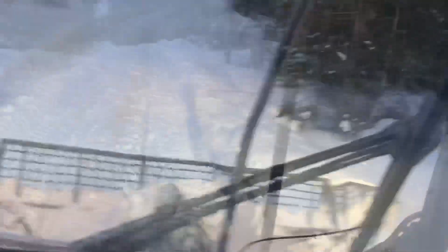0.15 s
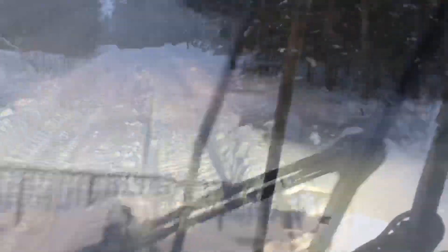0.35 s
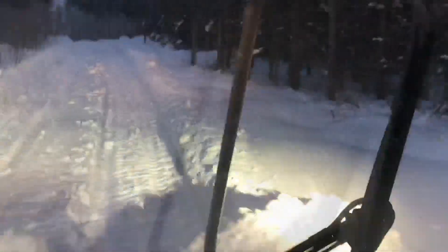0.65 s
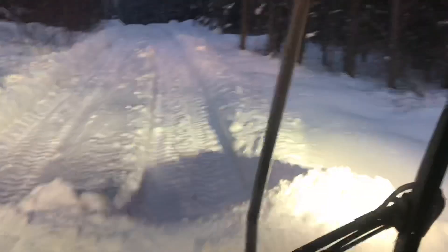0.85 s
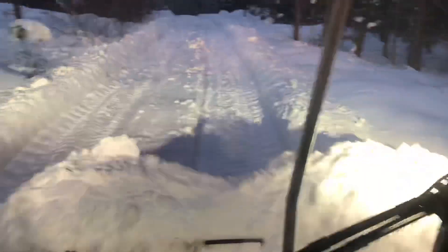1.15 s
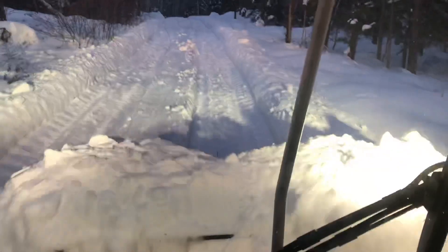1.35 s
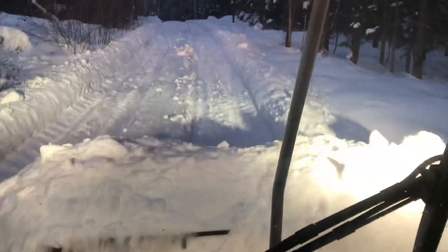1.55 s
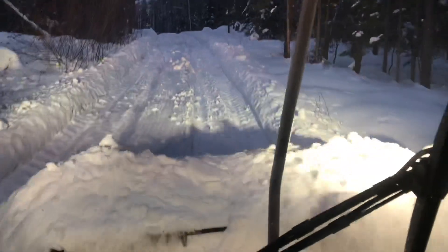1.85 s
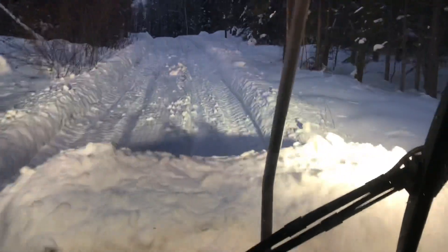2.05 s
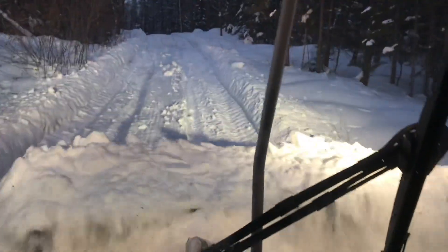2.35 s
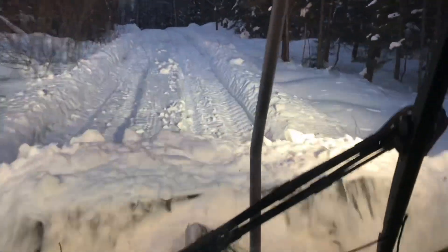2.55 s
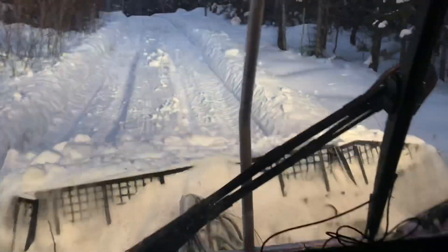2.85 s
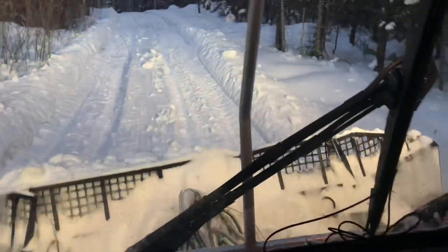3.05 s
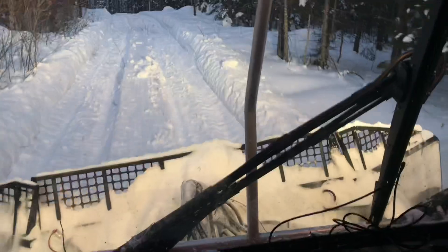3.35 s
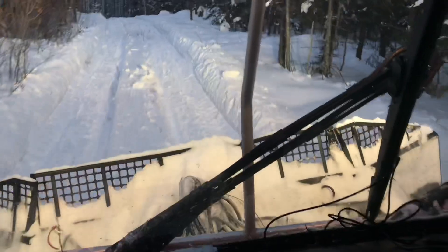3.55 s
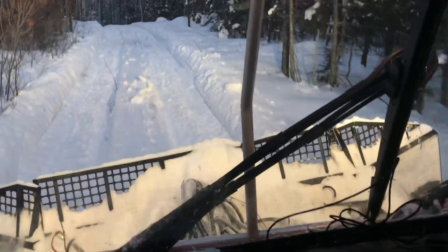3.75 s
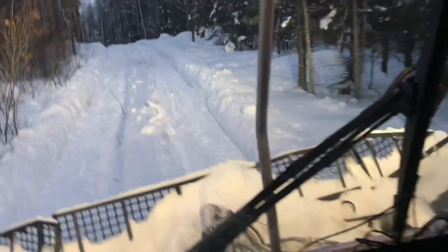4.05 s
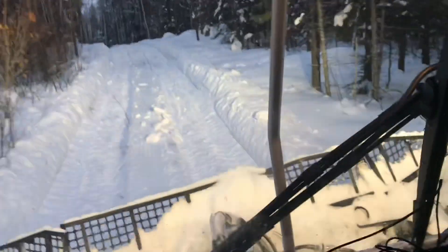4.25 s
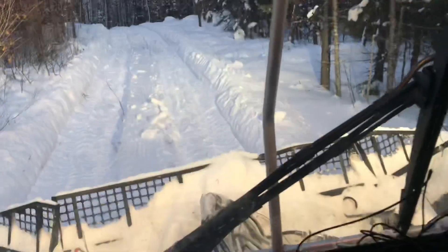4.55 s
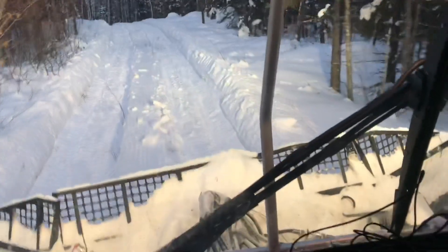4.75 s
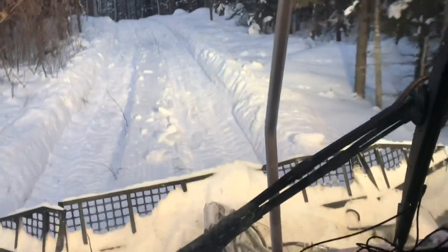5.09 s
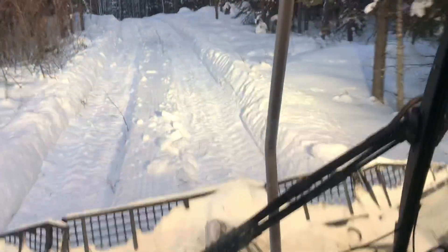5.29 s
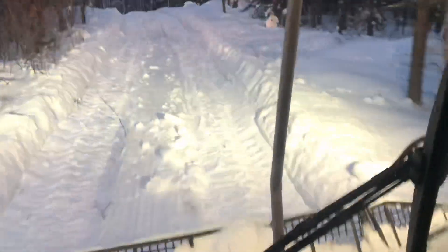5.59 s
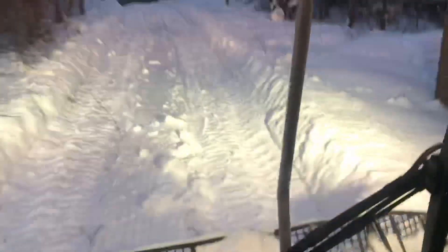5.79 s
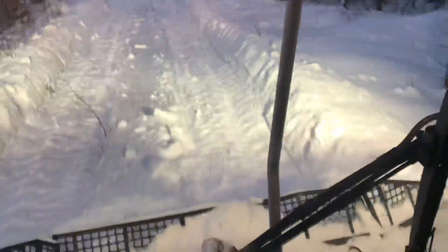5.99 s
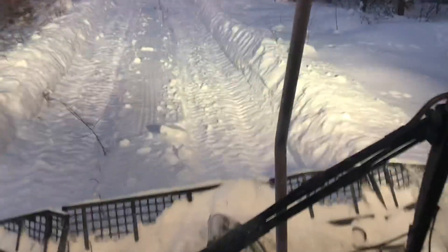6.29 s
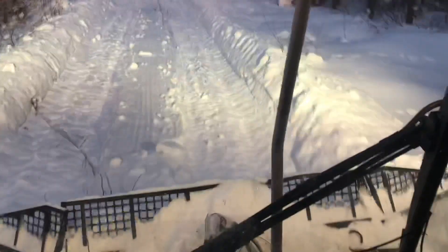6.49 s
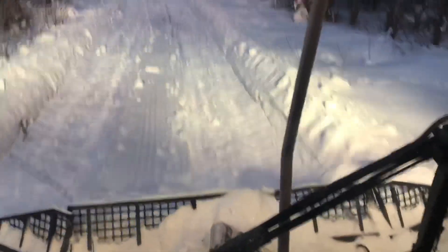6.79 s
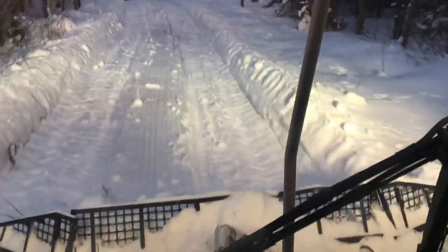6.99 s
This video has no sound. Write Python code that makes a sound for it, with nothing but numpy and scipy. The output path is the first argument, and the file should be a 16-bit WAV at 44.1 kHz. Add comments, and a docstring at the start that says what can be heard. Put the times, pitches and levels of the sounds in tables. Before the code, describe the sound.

A heavy diesel snow groomer works through deep snow, heard in mono from the driver's seat in a small closed cab. A low, lumpy exhaust drone near 50 hertz runs throughout with deep frame rumble, panel boom, muted clatter, soft hiss and a steady heater-fan hum. A dull bump opens the sound; drive-motor whine climbs over the first second, while pump whine swells until about 2 s. Loose fittings tick around 2.1-2.5 s as the whine rises to a peak near 3.4 s, over slow pulsing track throb. The drone thins around 4 s and the whine sags, with a knock at 4.7 s as power returns. Whine peaks again near 5.6 s. Knocks at 5.7 s lead to a sharp, dense rattle at 6.05-6.1 s while the engine eases. Another knock comes at 6.6 s, and drone and whine build again to the end at 7.1 s. A faint, breathy turbo whistle glides very high above.

```python
"""Cab of a snow groomer pushing deep snow. Diesel drone is a sum of engine orders; a geared shaft, whining
hydraulic pumps and a very high turbo whistle are partly smeared tones. Motor whine and cleat throb follow
one track speed. Filtered noise makes frame rumble, panel boom, clatter and hiss, with a buzz of engine orders.
Loose fittings tick and knock as decaying noise bursts, panels swell on single notes, a heater fan hums."""
import sys
import numpy as np
from scipy import signal
from scipy.fft import rfft, irfft, next_fast_len
from scipy.io import wavfile
from scipy.ndimage import uniform_filter1d

SR = 44100
rng = np.random.default_rng(int(sys.argv[2]) if len(sys.argv) > 2 else 0)


def store_pcm(level_fs):
    """Save levels as 16-bit WAV."""
    pcm = np.round(np.clip(level_fs, -1, 1) * 32767).astype(np.int16)
    wavfile.write(sys.argv[1], SR, np.atleast_2d(pcm).T)


N = 314425
TIME_S = np.arange(N) / SR

# engine speed: t/s, exhaust beat f/Hz
ENGINE_BEAT = [(0.0, 51.58), (0.32, 50.6), (0.8, 53.48), (1.12, 52.4), (1.92, 53.04), (2.4, 55.15),
               (2.56, 55.14), (2.72, 54.42), (2.88, 54.33), (3.2, 55.59), (3.84, 56.26), (4.48, 53.74),
               (4.96, 53.42), (5.6, 55.38), (6.08, 54.4), (6.24, 53.11), (6.4, 52.46), (7.13, 54.42)]
# engine load, easing briefly near 4 s and 6 s: t/s, level/dB re full load
ENGINE_LOAD = [(0.0, -2.5), (0.16, -11), (0.48, -9), (1.12, -5.5), (2.08, -1), (2.56, 4), (2.72, -3),
               (3.52, -3), (4.16, -14), (4.32, -15), (5.12, 2), (5.92, -8), (6.24, -11), (6.88, -1),
               (7.13, -5)]
# track speed: t/s, drive motor whine f/Hz
MOTOR_PITCH = [(0.0, 222.0), (0.56, 255.0), (1.28, 268.15), (1.6, 263.17), (1.76, 252.75), (2.08, 263.07),
               (2.88, 319.74), (3.36, 338.98), (3.68, 334.75), (4.16, 281.29), (4.32, 270.98),
               (4.64, 277.51), (5.28, 329.26), (5.76, 331.89), (6.24, 306.74), (6.4, 289.23),
               (7.13, 323.42)]
CRUISE_BEAT_HZ, CRUISE_MOTOR_HZ = 54, 300

# exhaust beat, its second and its fourth order: t/s, level/dB
EXHAUST_LEVEL = [(0, -30), (.3, -31), (.62, -23.5), (.85, -28.5), (1.1, -23), (1.35, -23.5), (1.6, -25),
                 (2.15, -23), (2.5, -33.5), (3.1, -22.5), (3.4, -36), (4, -47), (4.55, -36), (4.82, -24.5),
                 (5.25, -25.5), (5.65, -34), (6, -50), (6.25, -34), (6.6, -27.5), (7.13, -24.5)]
SECOND_LEVEL = [(0, -37), (.6, -30.5), (.85, -34), (1.08, -27.5), (1.55, -29.5), (1.92, -38), (2.25, -31),
                (2.55, -34), (2.83, -28), (3.1, -33), (3.4, -35), (3.7, -39), (4.25, -40), (4.65, -35),
                (5.1, -27.5), (5.8, -45), (6.55, -37.5), (6.85, -27), (7.13, -30)]
FOURTH_LEVEL = [(0, -39.5), (.4, -47), (.85, -34.5), (1.5, -31.5), (2.25, -30), (2.8, -31.5), (3.55, -28),
                (3.9, -35.5), (4.15, -55), (4.3, -33), (4.5, -30), (4.8, -32.5), (5.3, -32), (5.7, -37),
                (6.03, -46), (6.3, -32.5), (6.6, -32.5), (7.13, -29.5)]
# quarter orders from unequal cylinders, repeating once per engine cycle: multiple of beat, level/dB
CYLINDER_ORDERS = [(.5, -47), (1.25, -45), (1.75, -43.5), (2.5, -44), (3.25, -44.5), (4.5, -50), (5.5, -51),
                   (6, -53.5), (6.25, -51.5), (7, -57.5), (8, -53), (8.25, -57), (9.5, -54.5), (14, -67),
                   (14.5, -60), (18.25, -57), (20, -81)]

# low hum of a geared shaft: t/s, level/dB
SHAFT_LEVEL = [(0, -53), (1.9, -46), (2.3, -34.5), (2.8, -31), (3.4, -29.5), (4.1, -29.5), (4.35, -36),
               (4.9, -40), (5.05, -35), (5.9, -30), (6.1, -40), (7.13, -32)]
# gear and auxiliary tones: level/dB at full load and cruise, slope/(dB per dB load), slope/(dB per Hz beat)
GEAR_SLOPES = (-64.5, -0.7, .5)
AUXILIARY_SLOPES = (-47, 0, 0.91)
SHAFT_ORDER, GEAR_ORDER = 2.76, 15  # multiples of the beat

# pump piston tone, swelling with oil pressure: t/s, level/dB
PISTON_LEVEL = [(0, -54), (.5, -42), (.8, -37.5), (1.1, -33.5), (1.4, -33), (1.9, -30.5), (2.4, -40),
                (2.9, -38), (3.5, -42), (4.15, -55), (4.45, -40.5), (5.15, -36.5), (5.5, -39.5), (5.8, -51),
                (6.08, -45), (6.35, -38), (6.7, -35), (7.13, -40.5)]
# its octave: t/s, level/dB
OCTAVE_LEVEL = [(0, -51.5), (.45, -40.5), (.83, -53.5), (.99, -39.5), (1.5, -46.5), (1.95, -50),
                (2.45, -45), (2.9, -48.5), (3.8, -46.5), (4.3, -56), (5.2, -53), (5.6, -47.5), (5.95, -56),
                (6.4, -47), (7.13, -56)]
PISTON_ORDER, AUXILIARY_ORDER = 6.39, 9.74  # multiples of the beat

# drive motor whine before the cab resonance lifts it: t/s, level/dB
WHINE_LEVEL = [(0, -48), (.6, -47), (1, -44.5), (1.3, -46.5), (1.7, -44), (2.1, -45), (2.6, -39.5),
               (3.2, -46), (4, -50.5), (4.3, -47), (4.8, -43.5), (5.4, -46), (6, -57), (7.13, -55)]
# cleats on snow: t/s, level/dB
THROB_LEVEL = [(0, -55), (.8, -27.5), (1.1, -35), (1.35, -25), (1.6, -30), (1.75, -54), (2.05, -32),
               (2.55, -22.5), (2.95, -33), (3.15, -50), (3.55, -24), (3.85, -37), (4.25, -36), (4.6, -25.5),
               (5.2, -33), (5.4, -24), (5.7, -39), (6.0, -29.5), (6.25, -23), (6.45, -30), (6.72, -28),
               (7.13, -29)]
WHINE_PER_CLEAT = 7.45  # frequency ratio
SLIP_RMS_HZ = 1.553
CAB_RESONANCE_HZ, CAB_RESONANCE_WIDTH_HZ, CAB_RESONANCE_DB = 259.3, 30.4, 17

# turbo before rotor inertia smooths its pitch: t/s, blade tone f/Hz, reference level/dB
TURBO_BLADES = [(0, 13750, -63), (.18, 13400, -73), (.45, 11520, -79), (.7, 12020, -68.5),
                (1.55, 13650, -66.5), (2.6, 14650, -66), (3.8, 14950, -65), (4.27, 13100, -70),
                (4.7, 13280, -71), (5.55, 14180, -64), (6, 12550, -71), (6.35, 12130, -69),
                (7.13, 13400, -67)]
TURBO_INERTIA_S = .22

# knocks and ticks: t/s, ring level/dB, centre f/Hz, spread/octaves, t60/s, snap level/dB
FITTING_HITS = [(.069, -39.5, 1100, 1.1, 0.065, -60), (.224, -55, 10900, .27, .045, -58),
                (.334, -52, 5850, .18, .08, -62), (2.138, -38.5, 1200, .8, .09, -41),
                (2.167, -50, 6000, .3, .04, -54), (2.29, -40, 900, .8, 0.065, -39),
                (2.292, -44, 7000, 1.6, 0.11, -48), (2.542, -45, 2850, .13, .13, -48),
                (3.94, -40.5, 3180, 0.7, 0.076, -56), (4.245, -44.5, 5960, .1, .065, -44),
                (4.662, -31.5, 1150, 0.66, 0.086, -52), (5.111, -54, 12300, .2, .05, -57),
                (5.643, -38, 2000, 1.4, .08, -46), (5.646, -50, 8300, .15, .06, -56.5),
                (5.721, -26.5, 1100, .45, .07, -39.5), (5.722, -39, 4600, .35, .08, -46),
                (5.751, -42, 3500, 0.54, .06, -46), (5.775, -42.5, 3600, 0.71, .07, -42),
                (5.794, -43, 2200, .8, .09, -55), (5.884, -51, 10500, .4, .035, -50),
                (5.902, -55, 9000, .6, .04, -52), (5.921, -55, 10000, .4, .04, -53),
                (5.977, -52, 6500, .5, .04, -56), (6.025, -54, 5500, .5, 0.046, -58),
                (6.054, -43, 3000, 0.65, 0.056, -55), (6.0635, -20, 1300, .5, .04, -41),
                (6.066, -33, 4200, .4, .03, -38), (6.075, -32, 1400, .7, .04, -52),
                (6.082, -34, 2900, 0.43, 0.048, -45), (6.088, -30, 1200, .7, .04, -54),
                (6.099, -32.5, 1200, 0.77, .055, -44), (6.108, -36.5, 1400, 1.04, 0.1, -52),
                (6.138, -55, 7400, .6, .09, -57), (6.153, -53, 7400, .5, .08, -55),
                (6.275, -44, 2500, .5, .06, -62), (6.593, -33.5, 2700, 0.96, 0.087, -44),
                (6.596, -41, 6500, 0.18, 0.055, -50), (6.617, -44, 3400, 0.71, .07, -56),
                (7.087, -54, 9000, .6, .04, -58)]
# resonances of the fittings: f/Hz, width/Hz, gain/dB
FITTING_RESONANCES = [(1115, 160, 15.5), (1470, 250, 1), (2320, 370, 5), (2800, 220, 3.5), (3290, 190, 6),
                      (3970, 380, 6), (5000, 400, 3.5), (5840, 400, 5), (6570, 350, 4), (8300, 500, 4.5),
                      (9400, 360, 4.5), (12400, 700, 3), (14800, 700, 4)]
SNAP_T60_S, SNAP_DULL_HZ, CHATTER_RMS_DB = 0.038, 5000, 1.5

# panel swells over bumps: peak t/s, level/dB, f/Hz, Gaussian half length/s
PANEL_SWELLS = [(0.042, -22.5, 82, 0.035), (0.397, -33.5, 152, 0.11), (1.51, -29.5, 183.7, 0.041),
                (3.4, -22.5, 88, 0.019), (5.846, -30.5, 88.9, 0.23), (5.892, -28.5, 178, 0.064)]

# noise shapes, normalised later: f/Hz, relative density/dB
RUMBLE_SHAPE = [(14, -45), (21, 0), (32, -3.5), (44, 3), (62, -0.5), (85, 1.5), (110, -6), (160, -15.5),
                (400, -87)]
BOOM_SHAPE = [(60, -34), (115, 2.5), (150, -8), (185, 4.5), (205, -3), (250, -6), (320, -8.5), (370, -20.5),
              (450, -37), (620, -27), (1500, -78)]
CLATTER_SHAPE = [(180, 0), (280, 7.5), (400, 12), (440, -1), (520, 7.5), (600, 5), (700, 3), (830, -2),
                 (1030, 4), (1170, 0), (1300, -2.5), (1600, -13), (2200, -21.5), (5000, -43)]
HISS_SHAPE = [(900, -8), (1500, 12.5), (1900, 14), (2350, 10), (2680, 11.5), (3300, 7.5), (4300, 4),
              (5200, -1.5), (6200, -0.5), (7200, -6), (9300, -6.5), (10400, -12.5), (11500, -9),
              (15500, -12)]
# frame rumble, its level changing slowly: t/s, level/dB
RUMBLE_LEVEL = [(0, -38.5), (1.8, -30.5), (2.9, -26.5), (3.7, -27.5), (4.3, -24), (5.6, -26), (6.3, -28.5),
                (7.13, -27)]
# machinery: t/s, clatter level/dB, hiss level/dB
MACHINERY_LEVELS = [(0, -43, -53.5), (.75, -40.5, -50), (1.6, -39.5, -48.5), (2.7, -39, -48.5),
                    (3.6, -37.5, -48.5), (4.7, -39, -49.5), (5.4, -39, -49), (6.05, -38.5, -49),
                    (7.13, -39, -49.5)]
# weak orders in the panel buzz: multiple of beat, level/dB re boom at cruise
BUZZ_ORDERS = [(3, -8), (5, -17)]
# boom level at full load and cruise, with its slopes; extra slope of the buzz
BOOM_DB, BOOM_DB_PER_HZ, BOOM_DB_PER_LOAD_DB, BUZZ_DB_PER_HZ = -32.5, -0.01, 0.14, 0.12
# first reflections off the glass: delay/s, signed strength/1
GLASS_REFLECTIONS = [(.0013, .1), (.0031, -.11), (.0047, .11), (.0074, -.1), (.0112, .09)]
IMPACTS_PER_S = 400

FAN_HZ, FAN_DB, FAN_WAVER_RMS_HZ = 468, -46.5, 1.814
EDGE_HZ = 15800


def gain_of(db):
    """Decibels to amplitude."""
    return 10 ** (np.asarray(db) / 20)


def evened(x):
    """Scale to an rms of one."""
    return x / np.sqrt(np.mean(x ** 2) + 1e-20)


def curves(rows):
    """Interpolate each column of a time table to one value per sample."""
    s, *columns = np.transpose(rows)
    return [np.interp(TIME_S, s, column) for column in columns]


def turns_of(hz):
    """Integrate frequency to cycles."""
    return np.cumsum(hz * np.ones(N)) / SR


def coloured(x, spectrum):
    """Shape x by a spectrum, interpolated over log frequency; rms of one."""
    size = next_fast_len(N)
    f_hz, db = np.transpose(spectrum)
    log_hz = np.log(np.fft.rfftfreq(size, 1 / SR) + 1)
    gain = gain_of(np.interp(log_hz, np.log(f_hz), db))
    return evened(irfft(rfft(x, size) * gain, size)[:N])


def drift(rate_hz):
    """Random curve of rms one with a Gaussian spectrum rate_hz wide."""
    count, step = 16384, 20  # one point per 20 samples
    white = rfft(rng.standard_normal(count))
    hz = np.fft.rfftfreq(count, step / SR)
    slow = irfft(white * np.exp(-.5 * (hz / rate_hz) ** 2))
    return evened(np.interp(np.arange(N) / step, np.arange(count), slow))


def tone(turns, rough, width_hz):
    """Line of rms one; rough sets the share smeared over width_hz by random quadrature modulation."""
    angle = 2 * np.pi * (turns + rng.random())
    in_phase = (np.sqrt(2) + rough * drift(width_hz)) * np.cos(angle)
    quadrature = rough * drift(width_hz) * np.sin(angle)
    return evened(in_phase + quadrature)


def driven_db(law):
    """Level that follows engine load and speed linearly."""
    cruise_db, per_load, per_beat = law
    (load_db,), (beat_hz,) = curves(ENGINE_LOAD), curves(ENGINE_BEAT)
    return cruise_db + per_load * load_db + per_beat * (beat_hz - CRUISE_BEAT_HZ)


def reflected(x):
    """Close panes comb the sound into fixed peaks and dips."""
    echoes = sum(strength * np.roll(x, round(s * SR)) for s, strength in GLASS_REFLECTIONS)
    return evened(x + echoes)


def diesel(beats):
    """Exhaust pulses reach the cab as a few low orders; unequal cylinders make them lumpy."""
    exhaust_db, = curves(EXHAUST_LEVEL)
    second_db, = curves(SECOND_LEVEL)
    fourth_db, = curves(FOURTH_LEVEL)
    drone = gain_of(exhaust_db) * tone(beats, rough=.14, width_hz=8)
    drone += gain_of(second_db) * tone(2 * beats, rough=.16, width_hz=6)
    drone += gain_of(fourth_db) * tone(4 * beats, rough=.1, width_hz=14)
    for order, db in CYLINDER_ORDERS:
        drone += gain_of(db) * tone(order * beats, rough=.5, width_hz=1.5)
    return drone


def tracks(motor_hz):
    """Drive motors whine, wavering as the tracks slip; geared down from them, cleats slap the snow."""
    (motor_db,), (throb_db,) = curves(WHINE_LEVEL), curves(THROB_LEVEL)
    detuning = 2 * (motor_hz - CAB_RESONANCE_HZ) / CAB_RESONANCE_WIDTH_HZ
    whine_db = motor_db + CAB_RESONANCE_DB / (1 + detuning ** 2)
    motor = turns_of(motor_hz + SLIP_RMS_HZ * drift(5.57))
    cleats = motor / WHINE_PER_CLEAT

    whine = gain_of(whine_db) * tone(motor, rough=.28, width_hz=10)
    whine += gain_of(whine_db - 15.5) * tone(3 * motor / 2, rough=0.2, width_hz=85)
    whine += gain_of(whine_db - 21) * tone(2 * motor, rough=0.52, width_hz=8.9)
    # a blurred band of motor whine, slightly above the clean line
    whine += gain_of(-45.0) * tone(1.025 * motor, rough=2.6, width_hz=6.9)

    throb = gain_of(throb_db) * tone(cleats, rough=0.3, width_hz=4)
    throb += gain_of(throb_db - 9) * tone(2 * cleats, rough=0.4, width_hz=3)
    throb += gain_of(throb_db - 17.5) * tone(4 * cleats, rough=0.68, width_hz=2.7)
    return whine + throb


def pumps(beats):
    """Piston ripple and an auxiliary tone lie at fixed multiples of the exhaust beat."""
    (piston_db,), (octave_db,) = curves(PISTON_LEVEL), curves(OCTAVE_LEVEL)
    auxiliary_gain = gain_of(driven_db(AUXILIARY_SLOPES))
    whine = gain_of(piston_db) * tone(PISTON_ORDER * beats, rough=.14, width_hz=12)
    whine += gain_of(octave_db) * tone(2 * PISTON_ORDER * beats, rough=.12, width_hz=12)
    whine += auxiliary_gain * tone(AUXILIARY_ORDER * beats, rough=.15, width_hz=4)
    return whine


def gearbox(beats):
    """A shaft hums low; gear teeth sing when the load comes off."""
    shaft_db, = curves(SHAFT_LEVEL)
    hum = gain_of(shaft_db) * tone(SHAFT_ORDER * beats, rough=.6, width_hz=8)
    teeth = gain_of(driven_db(GEAR_SLOPES)) * tone(GEAR_ORDER * beats, rough=.3, width_hz=5)
    return hum + teeth


def turbo():
    """The heavy rotor's blade tone glides, frayed by turbulent air into a narrow band with a breathy skirt."""
    hz, db = curves(TURBO_BLADES)
    blades = turns_of(uniform_filter1d(hz, round(TURBO_INERTIA_S * SR), mode="nearest"))
    band = gain_of(1) * tone(blades, rough=4, width_hz=65)
    skirt = gain_of(-3.5) * tone(blades, rough=4, width_hz=300)
    return gain_of(db) * (band + skirt)


def rattles():
    """Each knock is a bright snap of contact and a chattering ring, both coloured by the fittings."""
    size = 16384
    t, hz, out = np.arange(size) / SR, np.fft.rfftfreq(size, 1 / SR), np.zeros(N + size)
    fittings_db = sum(db / (1 + (2 * (hz - f_hz) / width_hz) ** 2) for f_hz, width_hz, db in FITTING_RESONANCES)
    fittings = gain_of(fittings_db)
    attack = 1 - np.exp(-t / 0.0003)
    for s, db, centre_hz, octaves, t60_s, snap_db in FITTING_HITS:
        body, contact, chatter = rng.standard_normal((3, size))
        band = np.exp(-.5 * (np.log2((hz + 1) / centre_hz) / octaves) ** 2)
        ring = evened(irfft(rfft(body) * fittings * band))
        snap = evened(irfft(rfft(contact) * fittings / np.hypot(1, hz / SNAP_DULL_HZ)))
        chatter_db = CHATTER_RMS_DB * evened(uniform_filter1d(chatter, size=150))
        fade = attack * gain_of(db - 60 * t / t60_s)
        # restore the energy of the plain fade
        ring = evened(ring * fade * gain_of(chatter_db)) * np.sqrt(np.mean(fade ** 2))
        snap_fade = attack * gain_of(snap_db - 60 * t / SNAP_T60_S)
        start = round(s * SR)
        out[start:start + size] += ring + snap_fade * snap
    return out[:N]


def booms():
    """A shaken panel swells on one wavering note and dies away."""
    out = np.zeros(N)
    for s, db, hz, half_s in PANEL_SWELLS:
        swell = np.exp(-.5 * ((TIME_S - s) / half_s) ** 2)
        out += gain_of(db) * swell * tone(turns_of(hz), rough=0.61, width_hz=12)
    return out


def panel_boom(beats, motor_hz):
    """The ride shakes the panels into a low noise; they also pick out weak engine orders as a buzz."""
    load_db, = curves(ENGINE_LOAD)
    faster_hz = motor_hz - CRUISE_MOTOR_HZ
    buzz = sum(gain_of(db) * tone(order * beats, rough=0.16, width_hz=1.1) for order, db in BUZZ_ORDERS)
    boom_db = BOOM_DB + BOOM_DB_PER_HZ * faster_hz + BOOM_DB_PER_LOAD_DB * load_db
    noise = coloured(rng.standard_normal(N), BOOM_SHAPE)
    return gain_of(boom_db) * (noise + gain_of(BUZZ_DB_PER_HZ * faster_hz) * buzz)


def machinery(beats):
    """Clatter and hiss are noise pulsing with the engine, full of tiny impacts."""
    clatter_db, hiss_db = curves(MACHINERY_LEVELS)
    gears, air = rng.standard_normal((2, N))
    pulsing = 1 + .13 * np.cos(2 * np.pi * beats) + .05 * np.cos(2 * np.pi * 2 * beats)
    strikes = (rng.random(N) < IMPACTS_PER_S / SR) * rng.uniform(-1.45, 1, N)
    grain = rng.standard_normal(400) * np.exp(-np.arange(400) / 90)  # in samples
    impacts = evened(signal.oaconvolve(strikes, grain)[:N])
    clatter = coloured(reflected(gears * pulsing + gain_of(-11) * impacts), CLATTER_SHAPE)
    hiss = coloured(reflected(air * pulsing + gain_of(-21.0) * impacts), HISS_SHAPE)
    return gain_of(clatter_db) * clatter + gain_of(hiss_db + 0.3 * drift(17.0)) * hiss


def frame_rumble():
    """The ride shakes the frame: low noise, its level changing slowly."""
    rumble_db, = curves(RUMBLE_LEVEL)
    return gain_of(rumble_db) * coloured(rng.standard_normal(N), RUMBLE_SHAPE)


def heater_fan():
    """A steady hum, wavering slightly in pitch."""
    turns = turns_of(FAN_HZ + FAN_WAVER_RMS_HZ * drift(1))
    return gain_of(FAN_DB) * tone(turns, rough=.35, width_hz=3)


def scene():
    """Sum of all sources at the driver's seat, one channel."""
    (beat_hz,), (motor_hz,) = curves(ENGINE_BEAT), curves(MOTOR_PITCH)
    beats = turns_of(beat_hz)
    drive = diesel(beats) + tracks(motor_hz) + pumps(beats) + gearbox(beats) + turbo()
    loose = rattles() + booms()
    background = panel_boom(beats, motor_hz) + machinery(beats) + frame_rumble() + heater_fan()
    return (drive + loose + background)[None]


def record(dry):
    """Linear-phase low-pass at EDGE_HZ."""
    lowpass = signal.firwin(511, EDGE_HZ, window=("kaiser", 9), fs=SR)
    return signal.oaconvolve(dry, lowpass[None], "same")


dry = scene()
out = record(dry)
store_pcm(out)
```